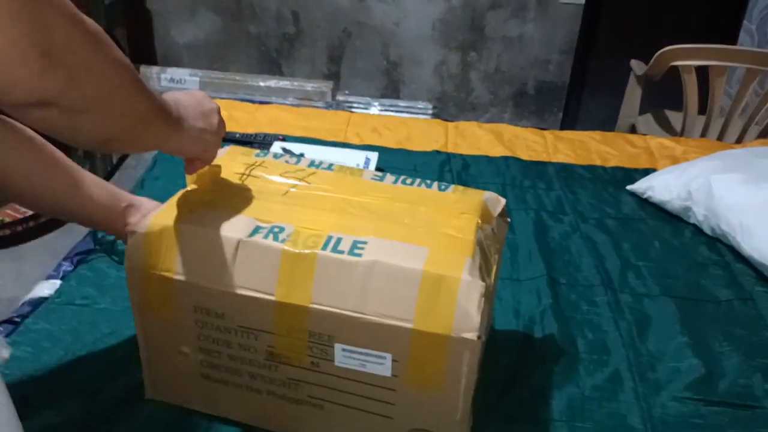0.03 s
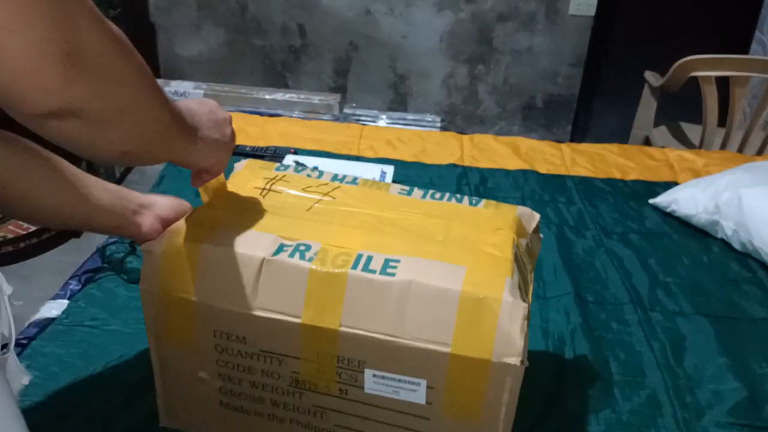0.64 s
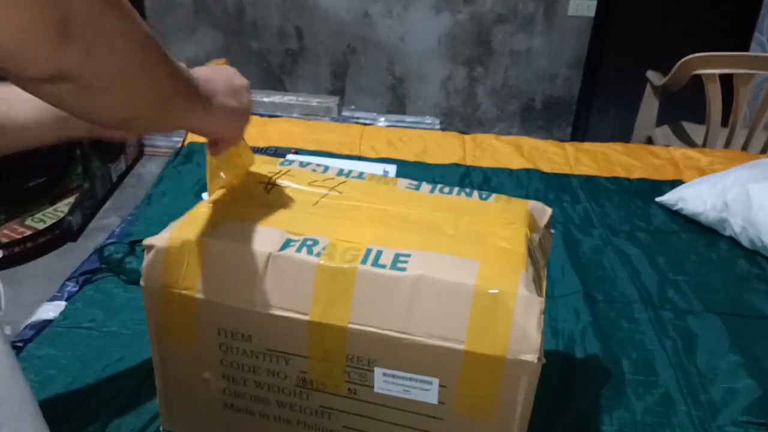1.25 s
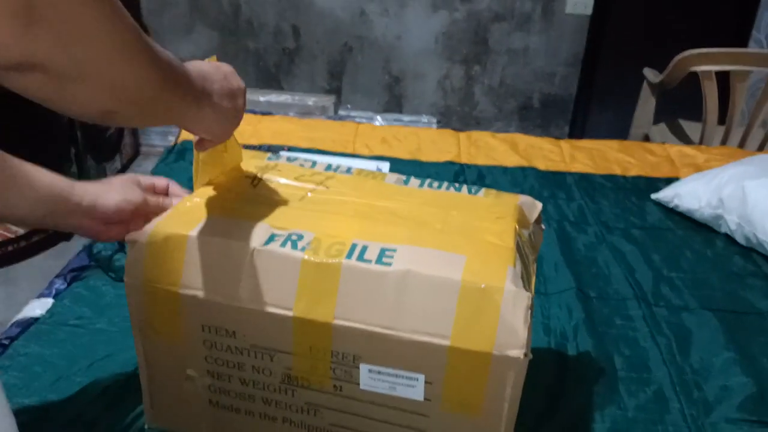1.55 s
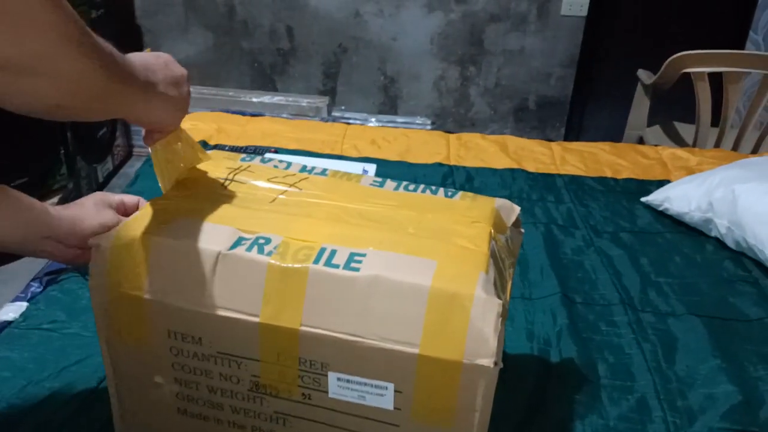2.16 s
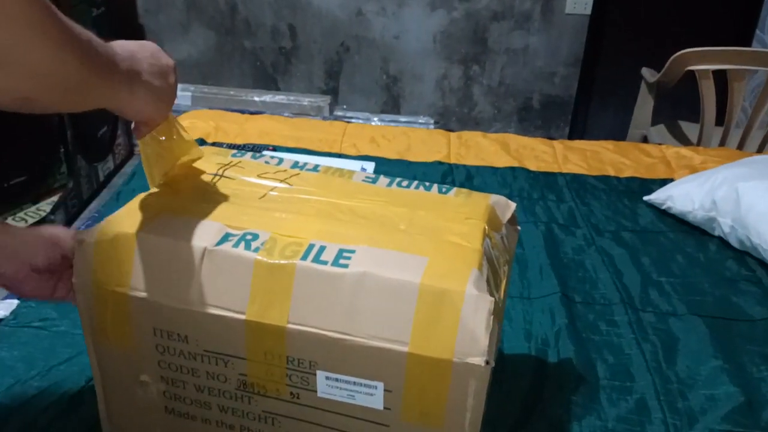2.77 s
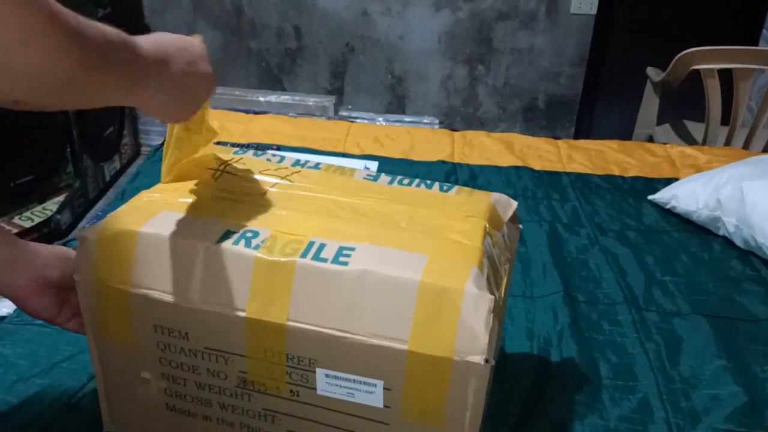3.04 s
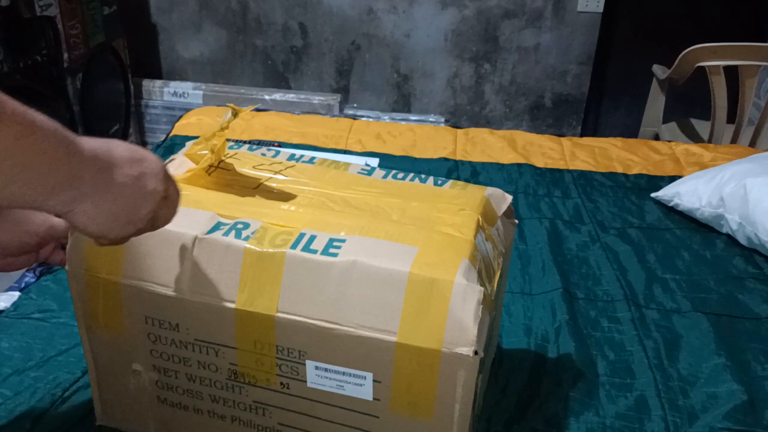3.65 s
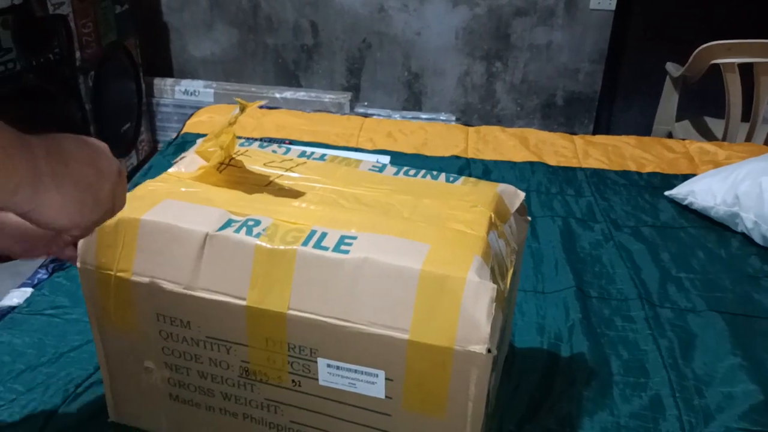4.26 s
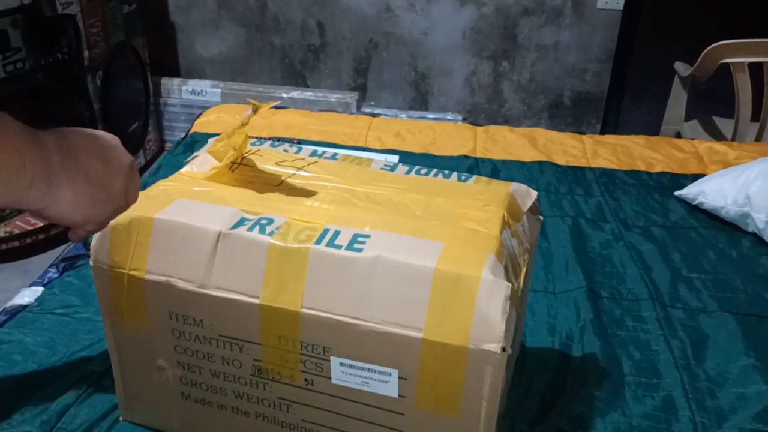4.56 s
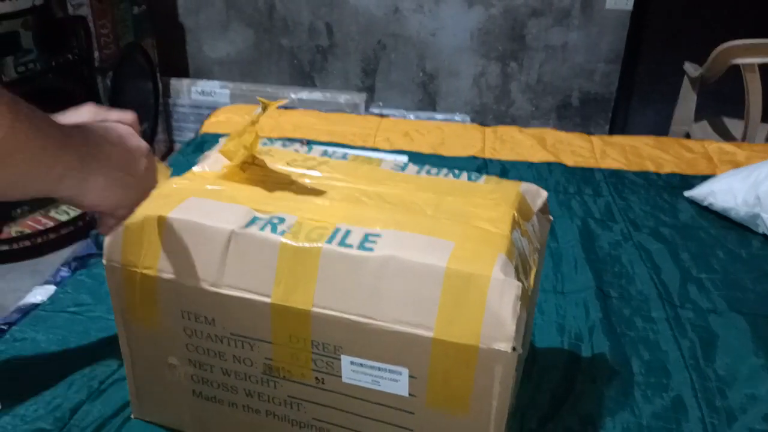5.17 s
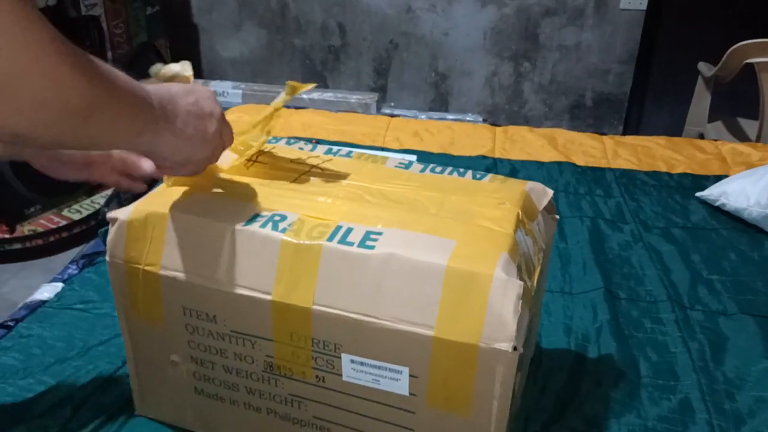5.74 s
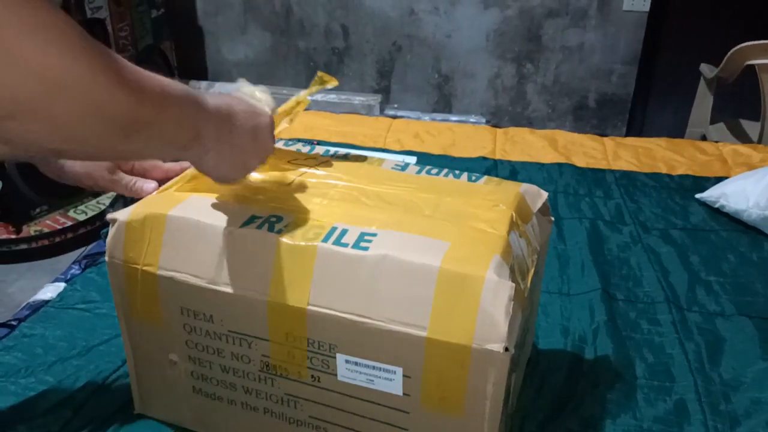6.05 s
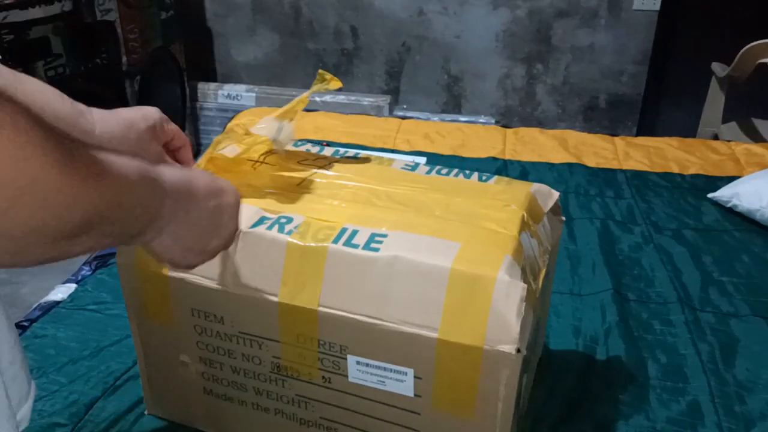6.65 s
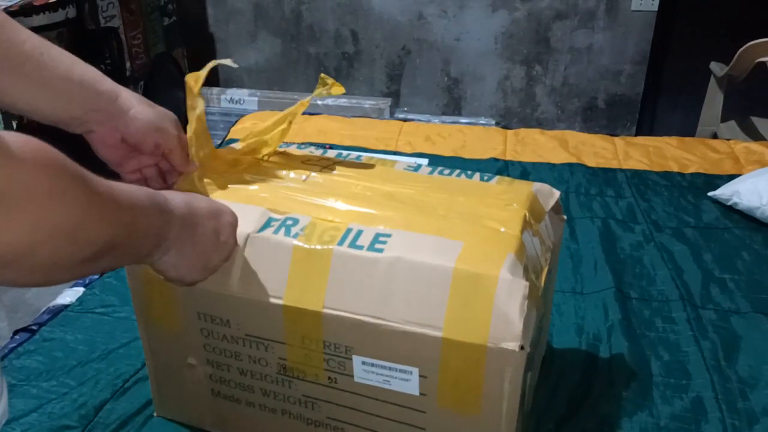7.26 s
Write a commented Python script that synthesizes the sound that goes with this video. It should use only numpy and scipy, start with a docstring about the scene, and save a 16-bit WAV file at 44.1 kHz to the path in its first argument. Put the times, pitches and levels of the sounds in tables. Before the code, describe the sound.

After faint handling ticks, fingertips pick at plastic packing tape on a cardboard box. From about 0.5 to 2.7 seconds, short, light pulls crackle as the glue lets go, with small snaps and soft bumps. The loudest rip comes at about 2.8 seconds and lasts until 3.2, the stiff tape snapping and crinkling. Lighter tugs follow, with a firmer one near 4.5 seconds. From 5 to 6 seconds there is a run of strong rips with sharp snaps. A few last pulls continue until just past 7 seconds, with a hollow bump near 6.5 and a tiny finger squeak near 7. All along, the hollow box rumbles and scrapes under the hands and the pulling. The microphone is about a metre away in a small, quiet room with a faint low background rumble and a short, bright echo from concrete walls.

```python
"""Packing tape comes off a cardboard box in a small bare room, a metre from a phone's two microphones.
After a faint handling tick, fingertips pick at the tape and short pulls break glue threads in a crackle.
Near 3 s comes the loudest rip, the stiff film snapping and crinkling. Lighter tugs lead to a run of
rips from 5 to 6 s, then a few last pulls and bumps. All along, the hollow box rumbles under the hands
and the pull, and concrete walls add a short bright echo."""
import sys
import numpy as np
from scipy import signal
from scipy.fft import rfft, irfft
from scipy.io import wavfile
from scipy.ndimage import uniform_filter1d

SR = 44100
rng = np.random.default_rng(int(sys.argv[2]) if len(sys.argv) > 2 else 0)


def pcm_store(signal):
    """Save signal as 16-bit PCM."""
    levels = np.round(np.clip(np.atleast_2d(signal), -1, 1) * 32767)
    wavfile.write(sys.argv[1], SR, levels.astype(np.int16).T)


N = 322371
TIME = np.arange(N) / SR
HAND_TIME = TIME[::32]  # the hand moves slowly, so a coarse clock serves

# Tone of each source. Each row: frequency in Hz, gain in dB.
AIR_TONE = [(20, -6.5), (45, 8.5), (90, -4.5), (135, 4.5), (300, -4.5), (600, -13), (1500, -23),
            (4400, -18.5), (14000, -32)]
RUMBLE_TONE = [(40, -48), (100, -8.5), (160, -1.5), (210, -1.5), (280, 0.5), (380, -3), (600, -7.5),
               (1500, -37)]
SCRAPE_TONE = [(200, -24.5), (350, -3.5), (470, -4.5), (650, 0.5), (850, -3), (1150, -1), (1700, -16.5),
               (4000, -28)]
CRINKLE_TONE = [(500, -43), (2000, -23), (6000, 10.5), (11500, -4.5), (15500, 5.5)]
FILM_TONE = [(60, -26), (150, -21), (280, -11.5), (550, -9), (850, -17), (1350, -6), (1750, -4.5),
             (2600, -0.5), (3100, -.5), (3600, -2), (4400, 1), (5200, -1), (7000, -3.5), (15500, -7.5)]
# Treble response of each microphone port. Each row: frequency in Hz, gain in dB.
LEFT_MIC = [(6000, 0.5), (7100, 2), (8000, -0.5), (9500, -3.5), (10800, 5.5), (12000, 4.5), (13500, 1),
            (15700, -7.5)]
RIGHT_MIC = [(7500, -0.5), (8300, 0), (8900, 4), (9900, -8), (11700, 1.5), (13200, -8.5), (14300, 4),
             (15700, -11.5)]
# Echo of the concrete walls. Each row: frequency in Hz, seconds to fall 60 dB.
WALL_DECAY = [(100, 0.53), (400, 0.39), (1200, 0.52), (3000, 0.61), (7000, 0.56), (14000, 0.41)]
# Modes of a box panel. Each row: multiple of the base pitch, gain in dB, seconds to fall 60 dB.
PANEL_MODES = [(1.002, 3.5, 0.1), (1.24, -2.5, 0.075), (2.2, -1, 0.074), (3.1, 6.5, 0.023),
               (4.6, -2.5, 0.021), (5.5, 17, 0.011), (6.8, 10, 0.027)]
# Bumps on the box. Each row: start in seconds, relative peak in dB, base pitch in Hz, contact in seconds.
BOX_BUMPS = [(0.513, -35.5, 162, 0.0015), (0.64, -31, 182.6, 0.0057), (1.205, -28.5, 206, 0.0027),
             (1.501, -32, 128, 0.0033), (1.715, -32.5, 127, 0.019), (4.161, -34.5, 349, 0.0019),
             (5.575, -23, 195, 0.0091), (6.4568, -20.5, 203, 0.00087), (6.632, -41, 576, 0.0018),
             (6.781, -33, 204, 0.005), (7.104, -28.5, 209, 0.00048)]
# A hand rubs the box. Each row: start, swell and hold in seconds, then relative rumble and
# scrape over rumble in dB.
HAND_RUBS = [(0.51, 0.017, 0.18, -49, -14), (0.597, 0.17, 0.18, -43.5, 0), (1.471, 0.022, .06, -53, -21),
             (1.572, 0.12, 0.063, -51.5, -3.5), (5.045, 0.036, 0.31, -60, -15),
             (5.546, 0.029, 0.099, -46.5, -18), (6.718, .06, .03, -49.5, -10), (7.204, 0.1, .03, -60, -10)]
# Fingertips on the film. Each row: centre in seconds, peak in dB, pitch in Hz, half length in seconds.
FINGER_SQUEAKS = [(0.275, -40, 2900, 0.0011), (0.365, -63, 1670, .003), (0.386, -47, 2400, 0.0025),
                  (0.398, -61, 2300, 0.0023), (3.704, -49, 1830, 0.0027), (7.045, -31.5, 1570, 0.0011)]
# A faint handling tick on the right microphone, then snaps of buckling film.
# Each row: start in seconds, relative level in dB, ring in Hz, left minus right in dB.
TICK_AND_SNAPS = [(0.3302, -47.5, 9450, -13), (0.4154, -42.5, 5850, -4), (0.993, -27.5, 11800, 5),
                  (1.0153, -22.5, 12100, 4.5), (1.427, -22, 7900, 2), (1.441, -32, 4540, -4),
                  (1.5259, -26.5, 11300, 4), (1.621, -34, 11300, 8), (2.0496, -21.5, 5650, 1.5),
                  (2.352, -32.5, 11700, 7), (2.587, -42, 11300, 3), (2.696, -49, 3000, 4),
                  (2.8294, -12.5, 7700, 0.5), (2.861, -16.5, 7400, 9), (2.8821, -21, 2480, -7),
                  (2.8878, -14.5, 3800, 3), (2.936, -12, 2410, 0.5), (2.953, -27, 4000, -11),
                  (3.0246, -12.5, 5950, 5.5), (3.0682, -16, 2780, 10), (3.094, -12, 3140, 0.5),
                  (3.416, -35.5, 6840, -4), (3.606, -38, 9100, 2), (3.862, -35.5, 3300, -4),
                  (4.3482, -31.5, 3000, -4.5), (4.396, -33, 2260, 0), (5.2005, -21, 9000, 7),
                  (5.5577, -13.5, 12100, 3), (5.563, -12.5, 12400, 1), (5.5778, -11, 11400, 0),
                  (5.5885, -16, 4460, -0.5), (5.6233, -15, 11600, -4), (5.9689, -11, 11400, -6.5),
                  (6.2418, -30, 10100, -4), (6.4366, -35, 6300, 1), (6.727, -28, 11800, 9),
                  (6.837, -21.5, 14400, 4.5), (7.1028, -22, 2080, 1)]
# Where the tape peels, heard from the phone. Each row: time in seconds, left minus right in dB,
# lag of the left microphone in samples.
PEEL_POSITION = [(0.5, 0.5, 18.1), (1.5, 2, 11.7), (4.6, 1.5, 15.4), (5.1, 1.5, 2.5), (6.2, 4, 5),
                 (7.1, -0.5, 16)]
# A faint, dull tail dies away at the start; the other rows are tape pulls. Each row: start, swell and
# hold in seconds, then relative crackle, extra treble, box rumble and scrape over rumble in dB.
TAIL_AND_PULLS = [(0.0, 0.0052, 0.0042, -55.5, -20, -79, -2), (0.375, 0.023, 0.025, -57.5, 15.5, -82, -4),
                  (0.466, .10, 0.23, -43, -2.5, -63, 4), (0.676, 0.18, 0.14, -38, 1.5, -63, 5),
                  (0.984, 0.033, 0.024, -33, -0.5, -57.5, 9.5), (1.061, 0.046, 0.048, -41.5, 2.5, -58.5, 9),
                  (1.182, 0.0052, 0.047, -29.5, 2.5, -49, -1), (1.418, 0.014, 0.0052, -27.5, 1.5, -58, 9),
                  (1.49, 0.051, 0.12, -54, 7, -62, -1), (1.688, 0.042, 0.011, -52.5, 12, -60, -13),
                  (1.981, 0.042, 0.0086, -49, -0.5, -61, 5), (2.045, 0.0077, 0.02, -31.5, -4.5, -59, -4),
                  (2.09, 0.035, 0.24, -48.5, 8, -70.5, 7.5), (2.646, 0.12, 0.044, -48, 1, -67, 1),
                  (2.825, 0.008, 0.14, -18, -6, -44, -10), (2.96, 0.09, 0.064, -20.5, -5, -43, 4),
                  (3.156, 0.066, 0.13, -45, 2.5, -64.5, 12), (3.355, 0.076, .21, -52.5, 5.5, -80, -8),
                  (3.7, 0.051, .05, -55.5, 5, -73, 9), (3.839, 0.011, 0.0068, -36.5, -7.5, -64, 5),
                  (3.942, .12, 0.01, -32, -6, -50.5, 5.5), (4.167, 0.044, 0.034, -41, -3, -57.5, -1.5),
                  (4.333, 0.011, 0.24, -36.5, -8, -63, -5), (4.488, 0.075, 0.024, -29.5, -3.5, -42, 7),
                  (4.638, 0.021, 0.12, -49, -2, -72.5, 11), (4.904, 0.046, 0.021, -37.5, -2.5, -66.5, 12.5),
                  (5.044, 0.076, 0.029, -24, -4.5, -39.5, 2), (5.15, 0.025, 0.13, -28, -3, -42, 1.5),
                  (5.303, 0.029, 0.21, -40, -2.5, -54, 0), (5.509, 0.053, 0.11, -27.5, 3, -44.5, -2),
                  (5.83, 0.064, 0.062, -46, 9, -64, 7), (5.954, .025, 0.036, -24.5, 4, -41, 0),
                  (6.15, .1, 0.0067, -37.5, 9.5, -59.5, 10.5), (6.417, 0.029, 0.043, -35, -1.5, -65, -2),
                  (6.523, 0.15, .15, -45, 4, -55, -7), (6.789, 0.044, 0.28, -36, 0.5, -68, 9.5),
                  (7.073, 0.028, 0.011, -27, -4, -48.5, 12.5), (7.178, 0.087, .1, -57, 7, -69, -12)]


def undb(db):
    """Decibels to gain."""
    return 10 ** (np.asarray(db) / 20)


def unit(x):
    """Scale to rms 1."""
    return x / np.sqrt(np.mean(x ** 2))


def curves(table):
    """Each column of a table of times, joined by straight lines."""
    times, *columns = np.transpose(table)
    return [np.interp(TIME, times, column) for column in columns]


def on_log_axis(hz, points):
    """Read (Hz, value) points on a log-frequency axis."""
    f, value = np.transpose(points)
    return np.interp(np.log(np.maximum(hz, 1)), np.log(f), value)


def colour(x, points, size=4096):
    """Causal filter with the given (Hz, dB) response."""
    gain = undb(on_log_axis(np.arange(size // 2 + 1) * SR / size, points))
    cepstrum = irfft(np.log(gain))
    cepstrum[1:size // 2] *= 2
    cepstrum[size // 2 + 1:] = 0
    return signal.fftconvolve(x, irfft(np.exp(rfft(cepstrum))))[:len(x)]


def below(x, hz, order):
    """The part of a sound under a frequency, without delay."""
    f = np.arange(len(x) // 2 + 1) * SR / len(x)
    return irfft(rfft(x) / (1 + (f / hz) ** order), len(x))


def wander(turns_per_s):
    """Slow random drift with a spread near 1."""
    knots = rng.standard_normal(N // 50)
    return 1.2 * np.interp(TIME * turns_per_s, np.arange(len(knots)), knots)


def grains(per_s, spread_db=3):
    """Tiny clicks at random moments, many weak and a few strong; rms 1 at any rate."""
    chance = np.minimum(per_s / SR, 1)
    size = undb(spread_db * np.minimum(rng.exponential(size=N), 4))
    return unit((rng.random(N) < chance) * size * rng.choice([-1, 1], N) / np.sqrt(chance))


def shake(clicks, decay_s):
    """Each click shakes its own patch of film into a brief burst of noise."""
    power = signal.lfilter([1], [1, -np.exp(-2 / (decay_s * SR))], clicks ** 2)
    return np.sqrt(power) * rng.standard_normal(N)


def add(track, start_s, sound):
    """Mix a sound in at a time."""
    i = max(int(start_s * SR), 0)
    track[..., i:i + sound.shape[-1]] += sound[..., :N - i]


def mic_pair(x, left_db, lag_samples=14):
    """Place a source before the two microphones; the left one hears it a little later."""
    samples = np.arange(len(x))
    late = np.interp(samples - np.round(lag_samples), samples, x, left=0)
    return np.array([late * undb(left_db / 2), x * undb(-left_db / 2)])


def room_tone(level_db=-63, side_db=-8, drift_db=2):
    """The faint rumble of the quiet room."""
    mid, side = (unit(colour(rng.standard_normal(N), AIR_TONE)) for _ in range(2))
    stereo = mid + undb(side_db) * side * np.array([[1], [-1]])
    return undb(level_db - drift_db * wander(5.1)) * stereo


def wall_echo(x, early_db=4, early_s=0.011, onset_s=0.0036, alike_hz=750):
    """Near reflections from bed and wall, then the tail; the bass is alike at both microphones."""
    t, f = TIME[:SR], np.arange(SR // 2 + 1)
    mid, side = rfft(rng.standard_normal((2, SR)))
    apart = f ** 2 / (f ** 2 + alike_hz ** 2)
    field = (mid + np.sqrt(apart) * side * np.array([[1], [-1]])) / np.sqrt(1 + apart)
    swell = np.clip(t / onset_s - .5, 0, 1) * (1 + undb(early_db) * np.exp(-t / early_s))
    tail = 0
    for band_hz, t60 in WALL_DECAY:
        band = on_log_axis(f, [(hz, hz == band_hz) for hz, _ in WALL_DECAY])
        fade = swell * undb(-60 * t / t60)
        tail = tail + irfft(field * band, SR) * fade / np.sqrt(np.sum(fade ** 2))
    return signal.oaconvolve(x, tail, axes=1)[:, :N]


def shifting_echo(x, flaps_per_s=60, paths=5):
    """The strip twists and flaps, so its sound keeps taking other paths round the room."""
    facing = np.array([wander(flaps_per_s) for _ in range(paths)])
    facing = facing / np.sqrt(np.sum(facing ** 2, axis=0))
    return sum(wall_echo(x * share) for share in facing)


def box_drag(drag_db, rough_db, slips_per_s=500, rumble_db=2.5, scrape_db=-2):
    """Skin and tape slip over cardboard in small jerks: the hollow box rumbles, its surface scrapes."""
    rumble = unit(colour(grains(slips_per_s) * undb(drag_db), RUMBLE_TONE))
    scrape = unit(colour(grains(3 * slips_per_s), SCRAPE_TONE))
    strength = np.sqrt(np.mean(undb(drag_db) ** 2))
    return rumble * strength * undb(rumble_db) + scrape * undb(drag_db + rough_db + scrape_db)


def box_bumps(trim_db=-1, detune=0.0038):
    """A push rings one panel; a longer contact swells more slowly and weakens the higher modes."""
    out, t = np.zeros(N), TIME[:SR // 4]
    for start_s, peak_db, base_hz, contact_s in BOX_BUMPS:
        ring = 0
        for multiple, mode_db, t60 in PANEL_MODES:
            hz = base_hz * multiple
            mode = np.sin(2 * np.pi * hz * (1 + detune * rng.standard_normal()) * t)
            ring = ring + mode * undb(mode_db - 60 * t / t60) / (1 + (hz * contact_s) ** 2)
        ring *= 1 - np.exp(-(t / (1.08 * contact_s)) ** 2)
        add(out, start_s, ring / np.abs(ring).max() * undb(peak_db + trim_db))
    return out


def finger_squeaks(waver=0.12):
    """A fingertip sticks and slips for a few cycles at an unsteady pitch."""
    out, t = np.zeros(N), TIME[:SR // 25]
    for centre_s, peak_db, hz, half_s in FINGER_SQUEAKS:
        drift = unit(uniform_filter1d(rng.standard_normal(len(t)), size=40))
        phase = 2 * np.pi * np.cumsum(hz * (1 + waver * drift)) / SR
        swell = np.exp(-((t - t.mean()) / half_s) ** 2)
        add(out, centre_s - t.mean(), undb(peak_db) * swell * np.sin(phase))
    return out


def film_crinkles(pull_db, flips_per_s=30, moving_db=-46, level_db=-46):
    """Small creases flip at random while the strip moves, and rest when it lies still."""
    ticks = unit(colour(shake(grains(flips_per_s), decay_s=0.00058), CRINKLE_TONE))
    return ticks * undb(level_db) / np.sqrt(1 + undb(moving_db - pull_db) ** 2)


def tick_and_snaps(crack_s=0.0013, facet_s=0.00031, flutter_s=0.001, knock_s=0.0023, trim_db=1.5):
    """A buckling facet cracks, flutters, rings and jerks the box; the handling tick has the same shape."""
    out, t = np.zeros((2, N)), TIME[:2048]
    gain = undb(trim_db) * np.sqrt(0.002 * SR / len(t))  # levels count as if packed into 2 ms
    cardboard = signal.butter(3, [353, 2400], "bandpass", fs=SR, output="sos")
    fade = np.exp(-t / crack_s) + undb(-17) * np.exp(-t / flutter_s)
    for start_s, level_db, hz, left_db in TICK_AND_SNAPS:
        crack_noise, knock_noise = np.sign(rng.standard_normal((2, len(t))))
        # a small, high-pitched facet radiates little far below its ring
        low_cut = signal.butter(1, 0.87 * hz, "highpass", fs=SR, output="sos")
        crack = signal.sosfilt(low_cut, colour(crack_noise * fade, FILM_TONE))
        facet = np.sin(2 * np.pi * hz * t) * t * np.exp(-t / facet_s)
        knock = signal.sosfilt(cardboard, knock_noise * np.exp(-t / knock_s))
        # a bigger facet rings lower and jerks the cardboard harder
        jerk_db = -8 - 6 * np.log2(hz / 3000)
        snap = unit(unit(crack) + 0.49 * unit(facet)) + undb(jerk_db) * unit(knock)
        add(out, start_s, mic_pair(snap * gain * undb(level_db), left_db))
    return out


def stroke(start_s, swell_s, hold_s, swell_db=15.5, sag_db_per_s=11.5, release_db_per_s=325):
    """Gain that swells, holds with a slow sag like a tiring hand, and lets go."""
    t = HAND_TIME - start_s - swell_s
    db = swell_db * np.minimum(t / swell_s, 0)
    db -= sag_db_per_s * np.maximum(t, 0)
    db -= release_db_per_s * np.maximum(t - hold_s, 0)
    return undb(np.maximum(db, -120))


def stroke_levels():
    """Opening tail, pulls and rubs sum to dB curves: crackle, extra treble, rumble, scrape over rumble."""
    crackle = treble = rumble = scrape = 0
    for *timing, crackle_db, treble_db, box_db, scrape_db in TAIL_AND_PULLS:
        power = stroke(*timing) ** 2
        crackle += power * undb(crackle_db) ** 2
        treble += power * undb(crackle_db + treble_db) ** 2
        rumble += power * undb(box_db) ** 2
        scrape += power * undb(box_db + scrape_db) ** 2
    for *timing, box_db, scrape_db in HAND_RUBS:
        power = stroke(*timing) ** 2
        rumble += power * undb(box_db) ** 2
        scrape += power * undb(box_db + scrape_db) ** 2
    powers = crackle, treble / crackle, rumble, scrape / rumble
    return [np.interp(TIME, HAND_TIME, 10 * np.log10(power)) for power in powers]


def tape_peel(pull_db, taut_db, judder_db=2, judders_per_s=100, body_hz=1900, fizz_hz=6800):
    """Glue threads break, more of them in a hard pull; the peel line sticks and slips."""
    threads_per_s = 2200 * undb(0.7 * (pull_db + 36.5))
    breaks = grains(threads_per_s, spread_db=4)
    crackle = breaks + 0.92 * unit(shake(breaks, decay_s=0.00034))
    judder = undb(judder_db * wander(judders_per_s))
    film = unit(colour(crackle * judder, FILM_TONE))
    low, body = below(film, fizz_hz, order=6), below(film, body_hz, order=8)
    middle, fizz = low - body, film - low
    # taut film fizzes in the treble; slack film flaps and has more body
    slack_db = np.clip(-0.88 * (taut_db + 9.5), -4, 2)
    return undb(pull_db) * (undb(slack_db) * body + middle + undb(taut_db + 2) * fizz)


def scene(tape_db=-6, tape_echo_db=1.5, click_echo_db=-2, box_db=-1, box_echo_db=-4):
    """Tape and box reach the phone directly, from a metre off, and by way of the walls."""
    left_db, lag = curves(PEEL_POSITION)
    pull_db, taut_db, drag_db, rough_db = stroke_levels()
    tape = mic_pair(tape_peel(pull_db, taut_db), left_db, lag)
    clicks = tick_and_snaps() + mic_pair(film_crinkles(pull_db), left_db, lag)
    clicks += mic_pair(finger_squeaks(), left_db=10.5)
    box = mic_pair(box_drag(drag_db, rough_db) + box_bumps(), left_db=-1)
    direct = undb(tape_db) * tape + clicks + undb(box_db) * box
    strip_echo = shifting_echo(undb(tape_echo_db) * tape + undb(click_echo_db) * clicks)
    box_echo = undb(box_echo_db) * wall_echo(box)  # the box's echo keeps the same paths, so its low ringing stays steady
    return direct + strip_echo + box_echo + room_tone()


def record(dry):
    """Each microphone port colours the treble in its own way; full scale clips; the top is cut."""
    heard = np.clip([colour(dry[0], LEFT_MIC), colour(dry[1], RIGHT_MIC)], -1, 1)
    top_cut = signal.ellip(10, .1, 80, 16000, fs=SR, output="sos")
    return signal.sosfilt(top_cut, heard)


dry = scene()
out = record(dry)
pcm_store(out)
```